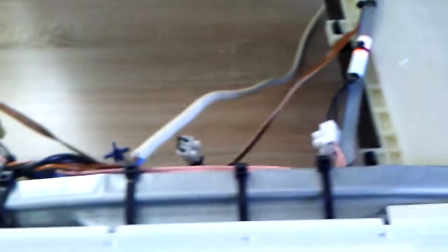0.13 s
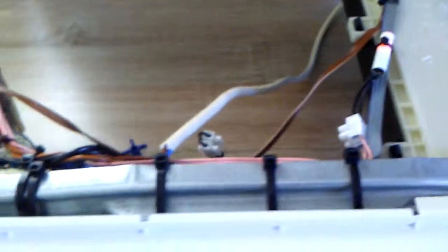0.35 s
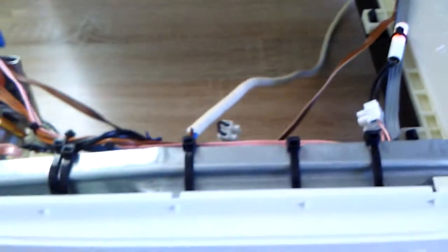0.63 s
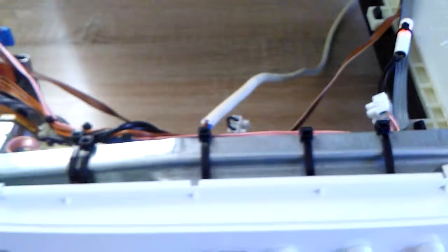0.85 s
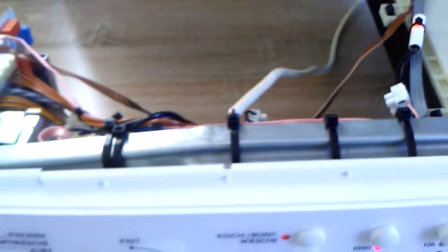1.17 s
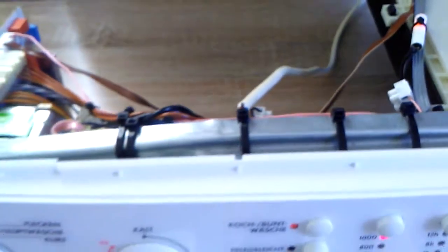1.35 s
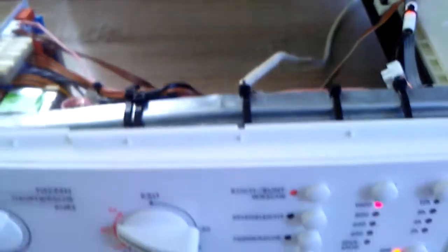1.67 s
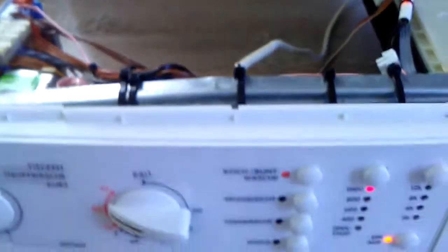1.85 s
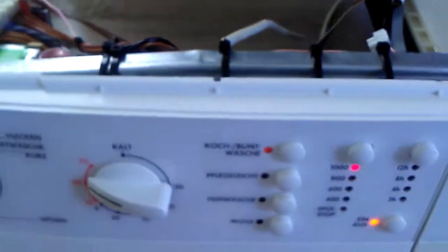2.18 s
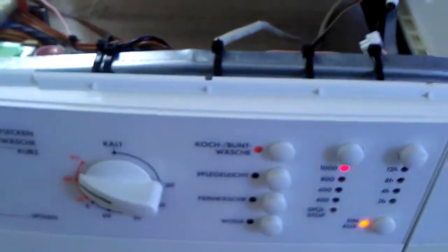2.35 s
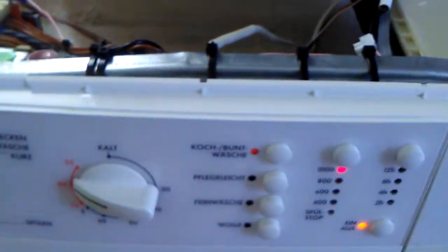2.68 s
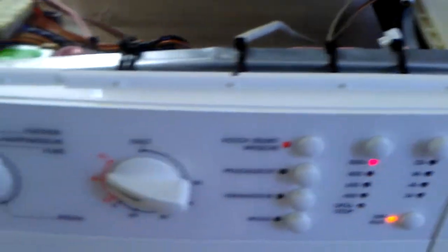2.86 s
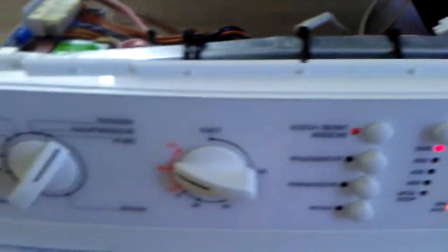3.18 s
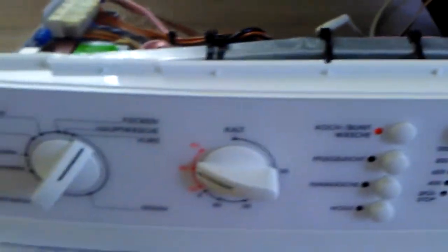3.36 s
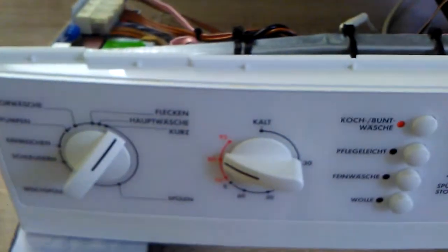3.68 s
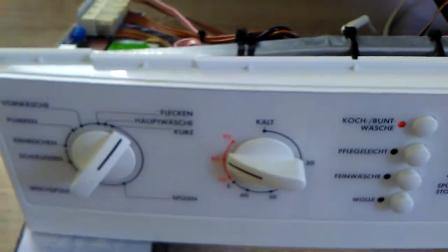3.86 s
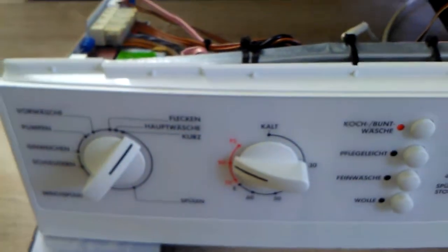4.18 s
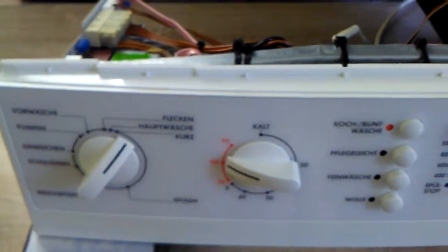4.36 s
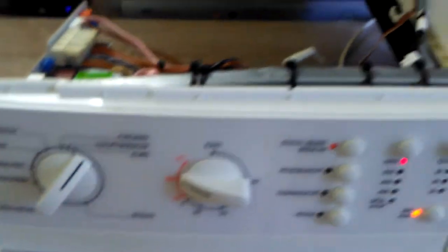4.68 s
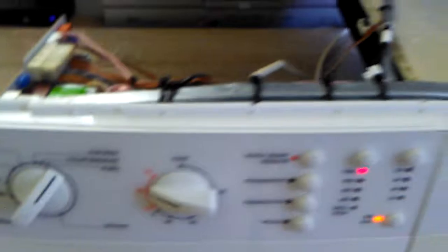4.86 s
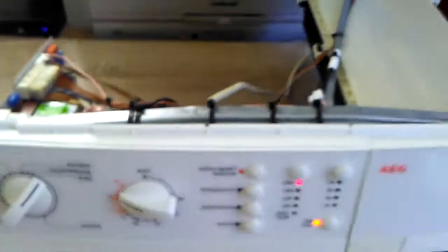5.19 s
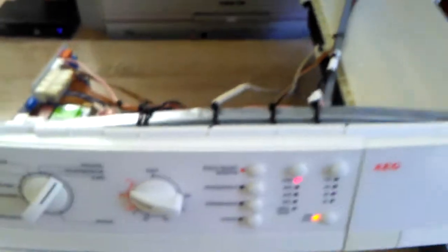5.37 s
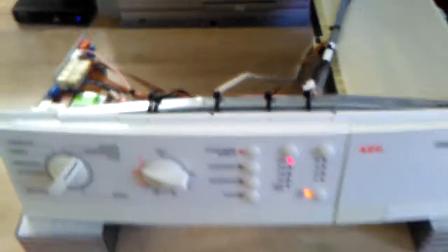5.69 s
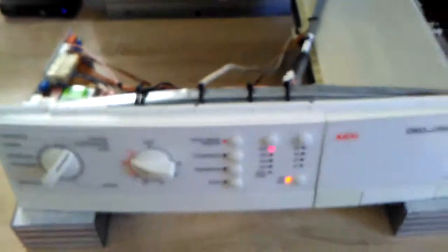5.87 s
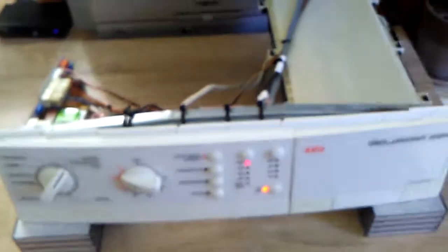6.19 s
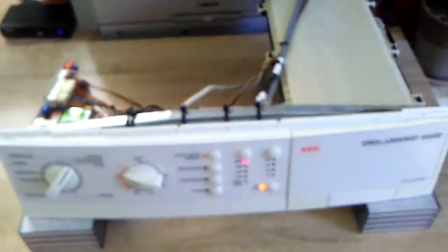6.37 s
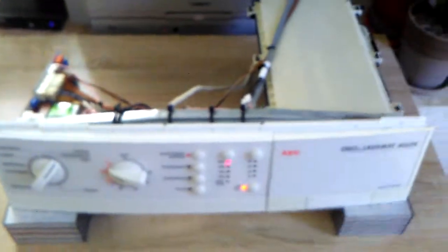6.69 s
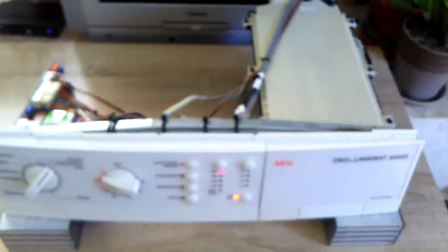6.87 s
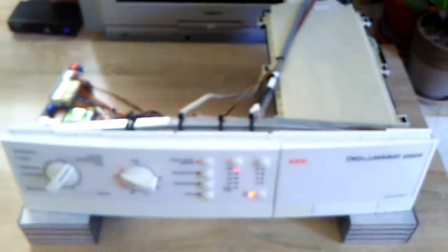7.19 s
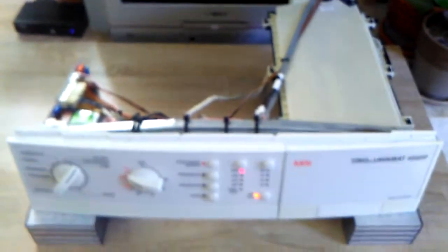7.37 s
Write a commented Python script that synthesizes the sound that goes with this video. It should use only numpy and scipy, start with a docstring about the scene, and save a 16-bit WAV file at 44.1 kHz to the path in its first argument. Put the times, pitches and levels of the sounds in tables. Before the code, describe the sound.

Irregular sharp relay clicks from an opened washing machine, mixed with finger bumps and rubbing on the microphone and a faint electrical hum.

```python
"""Washing machine relays, hand-held

Relays click on the board of an opened washing machine: each armature bounces, shakes the parts around it
and rings out in a small room. Close up, a hand knocks and rubs the camera case beside the right
microphone, whose port rings in the treble. A sleeve rustles and something scuffs on the left,
over a bed of faint mains hum and the hiss of both preamplifiers."""
import sys
import numpy as np
from scipy import signal
from scipy.fft import rfft, irfft
from scipy.io import wavfile

SR = 44100
rng = np.random.default_rng(int(sys.argv[2]) if len(sys.argv) > 2 else 0)


def file_out(sig):
    """Save sig as 16-bit WAV at sys.argv[1]."""
    # one column per channel
    cols = np.atleast_2d(sig).T
    # limit, then scale
    lim = np.clip(cols, -1, 1)
    pcm = np.round(lim * 32767).astype(np.int16)
    wavfile.write(sys.argv[1], SR, pcm)


N = 332073

# Table levels are relative: each layer adds its own gain.
# relay hits: t/s, contact/dB, spring/dB, housing/dB, board/dB, panel/dB, bounce/s
RELAY_HITS = [(-0.02, -33, -40, -48, -50.5, -72, 0.0018), (0.4944, -49, -43, -70, -60, -69, 0.0036),
              (1.0063, -53, -56, -69, -63, -71, 0.0026), (1.603, -46, -44, -67, -61.5, -60, 0.0031),
              (2.0228, -15.5, -24.5, -34, -38, -42, 0.0082), (2.4896, -62, -74, -75, -55, -47, 0.0077),
              (2.6453, -5.5, -11.5, -23.5, -34.5, -43.5, 0.0046), (3.821, -42, -41.5, -68, -63, -63, 0.003),
              (4.931, -43, -41.5, -70, -63, -62, 0.0018), (4.993, -22.5, -37, -52.5, -47, -32.5, 0.0014),
              (5.0433, -31.5, -37, -65, -48, -33.5, 0.0013), (5.0989, -23.5, -38, -52.5, -37, -30, 0.0012),
              (5.88, -21.5, -39, -51, -50.5, -69, 0.0041), (5.8876, -39, -20, -49, -58, -53.5, 0.0033),
              (5.9676, -14.5, -23.5, -39, -48, -52, 0.0042), (6.576, -39, -42, -42, -36, -39, 0.0051),
              (6.58, -14.5, -22, -26.5, -26.5, -36, 0.0018), (7.154, -46, -47, -61, -51, -58, 0.0016)]
# bands of a click (contact, spring, sparkle, housing, bracket, board, panel, cabinet):
# low/Hz, high/Hz, efficiency/dB, room t60/s, left-right likeness
CLICK_BANDS = [(6830, 9600, -19.5, 0.21, 0.18), (5340, 7200, -15.5, 0.24, 0.12),
               (9300, 14000, -8, 0.27, 0.1), (3620, 5180, -6.5, 0.29, 0.0047), (2090, 3300, -4, 0.38, .05),
               (997, 2020, -1.5, 0.27, 0.071), (426, 955, -3.5, 0.34, 0.63), (174, 345, -2, 0.62, 0.7)]
# resonances of the machine casing: f/Hz, width/Hz, level/dB
CASING_PEAKS = [(236.5, 21, 5.5), (488, 66, 9.5), (949, 33, 5), (1700, 290, -12), (3700, 280, -2.5),
                (4140, 91, -2), (6180, 73, -3)]
# fingernails on the camera case: t/s, shell/dB, thump/dB, rim/dB, seam/dB, nail/dB
NAIL_KNOCKS = [(4.665, -10.5, -23, -31.5, -36, -57), (5.748, -26, -33, -30.5, -42.5, -41),
               (5.827, -19.5, -16.5, -21.5, -29.5, -29), (6.473, -24, -35, -24, -47, -40),
               (6.672, -27, -60, -51, -50, -58), (6.95, -32, -50, -28.5, -26, -15.5)]
# finger pads on the camera case: t/s, shell/dB, thump/dB
PAD_BUMPS = [(0.14, -69, -46), (0.817, -62, -46), (1.356, -70, -46), (1.733, -36, -49), (1.909, -55, -52),
             (2.106, -44, -39), (2.153, -37.5, -33.5), (2.397, -37.5, -58), (2.83, -56, -45),
             (3.019, -38.5, -36.5), (3.074, -47, -34), (3.111, -72, -37), (3.329, -43, -35.5),
             (3.375, -47, -39), (3.431, -44, -41.5), (3.591, -65, -37), (3.745, -44, -37.5),
             (4.223, -30, -36.5), (4.274, -43, -38.5), (4.307, -42.5, -39), (4.8, -42.5, -38),
             (5.224, -27, -37), (5.599, -46, -34.5), (5.621, -42, -59), (6.142, -47, -38.5),
             (6.359, -53, -35.5), (6.734, -37, -39), (7.03, -57, -37)]
# modes that a knock sets ringing: f/Hz, level/dB, t60/s
MOUNT_MODES = [(64.8, 5, 0.13), (109.3, 3, 0.062), (166, 2, 0.025)]   # low thump of the microphone mount
SHELL_MODES = [(295, -2, 0.028), (426.4, 3.5, 0.04), (632, -6.5, 0.032)]   # hollow body of the case
RIM_MODES = [(833, 1.5, 0.0083), (1073, -1.5, 0.011), (1480, -1.5, 0.0038)]   # midrange clack of its rim
SEAM_MODES = [(2210, 7, 0.0014), (3010, 0.5, 0.003), (3970, -16, 0.0095)]   # snap of its seams
NAIL_MODES = [(5000, 3, 0.0017), (7600, -3.5, 0.0042), (8500, -4, 0.0018)]   # bright tick of the fingernail
# rumble of the grip on the mount: t/s, level/dB
GRIP_CURVE = [(0.0, -53.5), (0.67, -56.5), (1.15, -52), (2.12, -54), (2.29, -41), (2.41, -42), (2.81, -54),
              (3.63, -43.5), (4.05, -57), (4.4, -50), (4.65, -39.5), (5.03, -42.5), (5.18, -36),
              (5.56, -44.5), (5.81, -41.5), (6.14, -42.5), (6.36, -40.5), (6.67, -45), (6.9, -37.5),
              (7.23, -51), (7.53, -39.5)]
# strokes that swell, hold and fade: t/s (fully up), level/dB, hold/s
SKIN_DRAGS = [(4.685, -42.5, 0.035), (5.14, -41, 0.011), (5.225, -42, .025), (5.5, -53.5, 0.032),
              (5.622, -57, 0.22), (5.845, -49.5, 0.044), (5.989, -58, 0.016), (6.2, -54, 0.04),
              (6.335, -51.5, 0.03), (6.455, -46.5, 0.014), (6.754, -46.5, 0.0042), (6.86, -45.5, 0.14),
              (7.07, -55.5, .01), (7.12, -45, 0.039), (7.225, -42.5, 0.05), (7.33, -87, 0.0089),
              (7.43, -52.5, 0.015), (7.525, -73, .01)]
SLEEVE_SWISHES = [(1.014, -71, 0.0087), (1.25, -57, .015), (1.75, -56.5, 0.012), (2.3, -62.5, 0.18),
                  (3.23, -62, .01), (3.36, -71.5, .13), (4.92, -62, 0.48), (6.25, -53, 0.071),
                  (6.42, -53, 0.076), (6.99, -61, 0.013), (7.11, -63, 0.12), (7.5, -65.5, .03)]
# dry scuffs: t/s (fully up), level/dB, hold/s, f/Hz, width/Hz
SCUFFS = [(6.294, -58.5, 0.22, 1520, 834), (6.832, -54.5, 0.014, 2580, 498),
          (7.12, -57.5, 0.023, 2180, 900), (7.255, -55.5, 0.017, 1860, 895)]
# noise colours of skin on the case, fabric and preamplifiers: f/Hz, level/dB
SKIN_SPECTRUM = [(150, -4), (300, 3), (600, 0), (1100, -10), (1600, -20), (2300, -21), (3200, -26.5),
                 (5000, -32.5)]
SLEEVE_SPECTRUM = [(2000, -4), (3500, -16), (6000, -13.5), (8000, -9), (10000, -10.5), (14000, -22.5)]
HISS_SPECTRUM = [(24, -33.5), (40, 2.5), (78, -5), (151, -10.5), (171, -10.5), (208, -9), (446, -14.5),
                 (480, -19), (529, -12.5), (804, -16.5), (1720, -23.5), (2490, -24.5), (14300, -26)]
# wavering mains tones: f/Hz, width/Hz, level/dB
MAINS_TONES = [(50, 33, -60), (150.6, 3, -63)]
# resonances of the right microphone port: f/Hz, width/Hz, level/dB
PORT_PEAKS = [(8050, 1100, 13.5), (11020, 4400, 5.5), (14130, 1000, 12)]


def relays(crack_db=5.5, crack_t60=0.026, next_room_db=-15, next_room_t60=0.59):
    """Each armature bounces for some ms: a tight crack, the room's tail and faintly the next room."""
    times, contact, spring, housing, board, panel, bounce_s = np.transpose(RELAY_HITS)
    sparkle = np.maximum(contact - 18.5, spring - 17)   # a hard twang of the spring sparkles too
    bracket, cabinet = housing - 5.5, panel - 3
    levels_db = [contact, spring, sparkle, housing, bracket, board, panel, cabinet]
    preroll = SR // 10   # the first click lands just before the start
    starts = preroll + np.round(times * SR).astype(int)
    lengths = np.ceil(bounce_s * SR).astype(int)
    reflections = amp(drift(450))   # single reflections roughen the tail
    clicks = np.zeros((2, N))
    for level_db, (low_hz, high_hz, band_db, room_t60, alike) in zip(levels_db, CLICK_BANDS):
        power = np.zeros(preroll + N)
        for at, length, db in zip(starts, lengths, level_db):
            power[at:at + length] += amp(2 * (db + band_db)) / length
        crack = amp(2 * crack_db) * decay(power, crack_t60)
        next_room = amp(2 * next_room_db) * decay(power, next_room_t60)
        envelope = np.sqrt(crack + decay(power, room_t60) + next_room)[preroll:]
        clicks += envelope * noise_band(low_hz, high_hz, alike)
    return lift(clicks * reflections, CASING_PEAKS)


def case_knocks(touch_lead_s=0.00348, touch_db=-13.5):
    """Fingers hit the camera case: a light first touch, then the blow."""
    # soft pads barely reach rim and seams, and have no nail tick
    pads = [(t, shell, thump, shell - 25, shell - 30, -np.inf) for t, shell, thump in PAD_BUMPS]
    times, shell_db, thump_db, rim_db, seam_db, nail_db = np.transpose(pads + NAIL_KNOCKS)
    body = amp(1.5) * strike(times, shell_db, SHELL_MODES, soft_hz=1020)
    body += amp(13) * strike(times, rim_db, RIM_MODES, soft_hz=1920)
    body += amp(touch_db) * np.roll(body, -round(touch_lead_s * SR))
    thump = strike(times, thump_db, MOUNT_MODES, soft_hz=310)
    snap = amp(18) * strike(times, seam_db, SEAM_MODES, soft_hz=4700)
    snap += amp(4.5) * strike(times, nail_db, NAIL_MODES, soft_hz=11500)
    polarity = [[1], [-1]]   # the far microphone is pushed the other way
    return pan(-16, 0) * body + pan(-2, 11) * thump * polarity + pan(-24, 0) * snap


def grip_rumble():
    """The grip shakes the microphone mount in lumps, driving its two lowest modes."""
    times, levels_db = np.transpose(GRIP_CURVE)
    fader = amp(np.interp(np.arange(N) / SR, times, levels_db))
    shake = rng.standard_normal((2, N)) * amp(0.8 * drift(8))
    rumble = unit(sum(amp(db) * ring(shake, hz, t60) for hz, db, t60 in MOUNT_MODES[:2]))
    rumble[0] = 1.2 * rumble[0] - 0.2 * rumble[1]   # some of the right bleeds left, inverted
    return pan(-5, 6) * fader * rumble


def skin_rub():
    """Skin drags over the shell in grains, mostly on the right."""
    grains = amp(2.5 * drift(90))
    return pan(-8, 5) * grains * strokes(SKIN_DRAGS) * coloured(SKIN_SPECTRUM)


def sleeve():
    """Soft, airy fabric noise, swish by swish."""
    grains = amp(2.2 * drift(90))
    swishes = strokes(SLEEVE_SWISHES, rise_db_per_s=72, fall_db_per_s=99)
    return amp(-4.5) * grains * swishes * coloured(SLEEVE_SPECTRUM)


def scuffs():
    """Short dry scrapes on the left, each a stroke of noise through one broad resonance."""
    noise = rng.standard_normal((2, N))
    scrapes = np.zeros((2, N))
    for t, db, hold_s, hz, width in SCUFFS:
        texture = unit(resonance(resonance(noise, hz, width), hz, width))
        scrapes += strokes([(t, db, hold_s)]) * texture
    return pan(5, -3) * scrapes


def mains_hum():
    """Narrow bands of noise waver at the mains tones."""
    tones = [amp(db) * unit(resonance(rng.standard_normal(N), hz, width)) for hz, width, db in MAINS_TONES]
    return pan(3, -3) * sum(tones)


def preamp_hiss(level_db=-52.5):
    """Each preamplifier lays down its own steady noise floor."""
    return amp(level_db) * coloured(HISS_SPECTRUM)


def right_port(air):
    """The sound channel before the right microphone lifts the treble."""
    return np.array([air[0], lift(air[1], PORT_PEAKS)])


def strike(times, strengths_db, modes, soft_hz, lag_s=0.00119, uneven_db=2.4):
    """Blows ring one set of modes; the finger's softness rolls off the top."""
    at = np.round((times + lag_s) * SR).astype(int)
    spot = rng.standard_normal((len(times), len(modes)))   # each blow lands on another spot
    ringing = np.zeros(N)
    for k, (hz, mode_db, t60) in enumerate(modes):
        blows = np.zeros(N)
        blows[at] = amp(strengths_db + mode_db + uneven_db * spot[:, k])
        ringing += (-1) ** k * ring(blows, hz, t60)
    return signal.sosfilt(signal.butter(4, soft_hz, fs=SR, output="sos"), ringing)


def strokes(rows, rise_db_per_s=410, fall_db_per_s=312):
    """Envelope of separate strokes: each swells, holds and fades."""
    t = np.arange(N // 50 + 2) * 50 / SR
    gain = np.zeros(len(t))
    for start, db, hold_s in rows:
        attack_db = rise_db_per_s * np.maximum(start - t, 0)
        release_db = fall_db_per_s * np.maximum(t - start - hold_s, 0)
        gain += amp(db - attack_db - release_db)
    return np.interp(np.arange(N) / SR, t, gain)


def decay(power, t60):
    """Gives each burst of power a tail that falls 60 dB in t60 seconds."""
    return signal.lfilter([1], [1, -amp(-120 / (t60 * SR))], power + 1e-18)


def ring(x, hz, t60):
    """One mode: a click sets a dying sine ringing."""
    r, w = amp(-60 / (t60 * SR)), 2 * np.pi * hz / SR
    return signal.lfilter([0, np.sin(w)], [1, -2 * r * np.cos(w), r * r], x + 1e-18)


def resonance(x, hz, width_hz):
    """Band-pass with unity gain at its peak."""
    r, w = np.exp(-np.pi * width_hz / SR), 2 * np.pi * hz / SR
    return signal.lfilter(np.array([1, 0, -1]) * (1 - r * r) / 2, [1, -2 * r * np.cos(w), r * r], x)


def lift(x, peaks):
    """Layers resonant peaks on top of a sound."""
    return x + sum(amp(db) * resonance(x, hz, width) for hz, width, db in peaks)


def noise_band(low_hz, high_hz, alike):
    """Stereo noise in one band, rms 1; alike narrows the image."""
    shared, left, right = rng.standard_normal((3, N))
    noise = np.sqrt(alike) * shared + np.sqrt(1 - alike) * np.array([left, right])
    return unit(signal.sosfilt(signal.butter(4, [low_hz, high_hz], "band", fs=SR, output="sos"), noise))


def coloured(spectrum):
    """Wide stereo noise of a given colour, rms 1."""
    hz, db = np.transpose(spectrum)
    f = np.maximum(np.fft.rfftfreq(N, 1 / SR), 1)
    shape = amp(np.interp(np.log(f), np.log(hz), db))
    low_cut = np.minimum(f / hz[0], 1) ** 4
    return unit(irfft(rfft(rng.standard_normal((2, N))) * shape * low_cut, N))


def drift(rate_hz):
    """Smooth random modulation."""
    knots = rng.standard_normal(5000)
    return np.interp(np.arange(N) / SR * rate_hz, np.arange(len(knots)), knots)


def pan(left_db, right_db):
    """A gain for each side."""
    return amp([[left_db], [right_db]])


def amp(db):
    """Decibels to gain."""
    return 10 ** (np.asarray(db) / 20)


def unit(x):
    """Scale to rms 1."""
    return x / np.sqrt(np.mean(x ** 2) + 1e-30)


def scene():
    """The mix: the port colours airborne sounds; handling noise, hum and hiss bypass it."""
    hiss = preamp_hiss()
    airborne = right_port(relays() + sleeve() + scuffs())
    handling = case_knocks() + grip_rumble() + skin_rub()
    return airborne + handling + mains_hum() + hiss


def record(dry, low_cut_hz=40, stopband_hz=14650):
    """Rumble filter, hard ceiling, steep top cut."""
    trimmed = signal.sosfilt(signal.butter(4, low_cut_hz, "high", fs=SR, output="sos"), dry)
    top_cut = signal.cheby2(20, 60, stopband_hz, fs=SR, output="sos")
    return signal.sosfilt(top_cut, np.clip(trimmed, -1, 1))


dry = scene()
out = record(dry)
file_out(out)
```